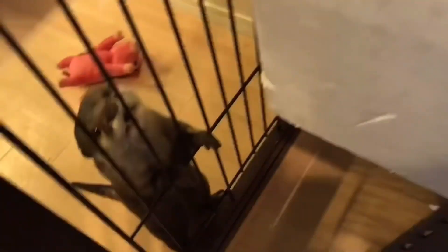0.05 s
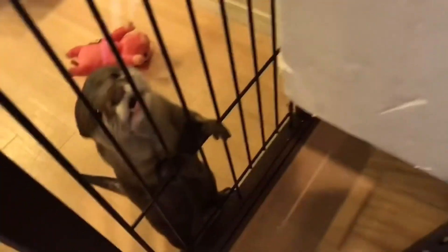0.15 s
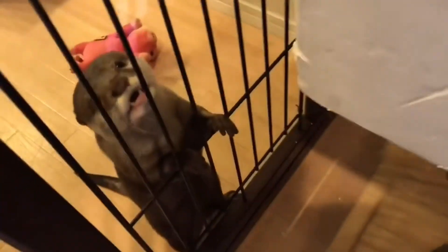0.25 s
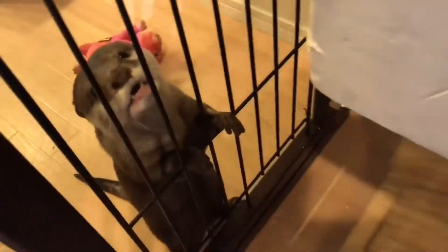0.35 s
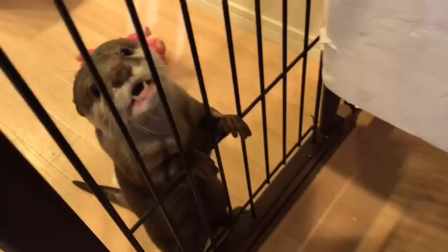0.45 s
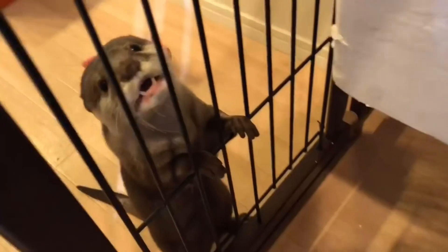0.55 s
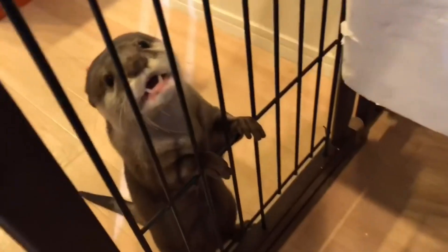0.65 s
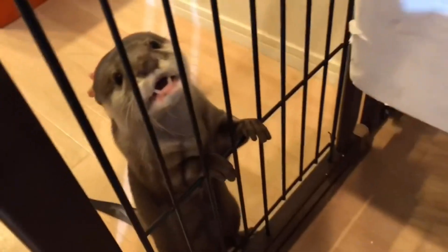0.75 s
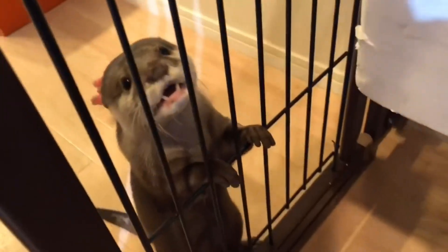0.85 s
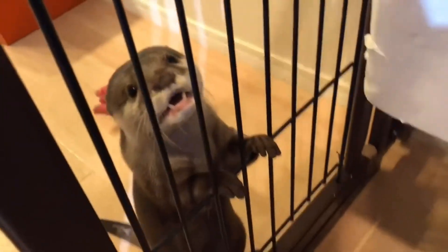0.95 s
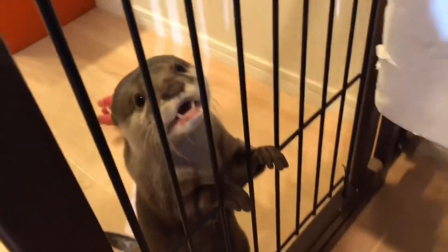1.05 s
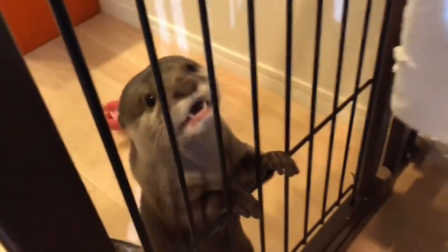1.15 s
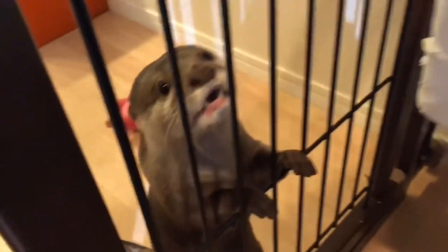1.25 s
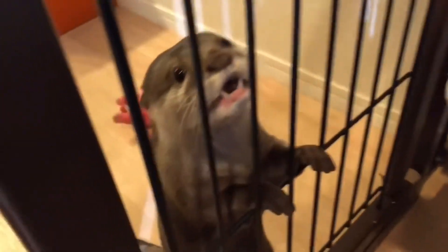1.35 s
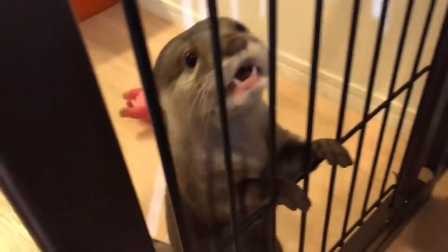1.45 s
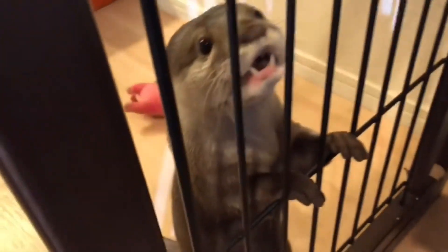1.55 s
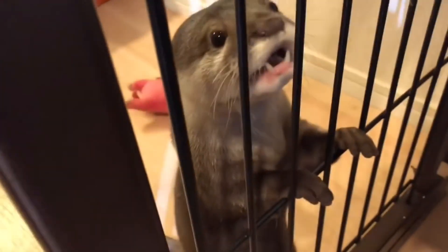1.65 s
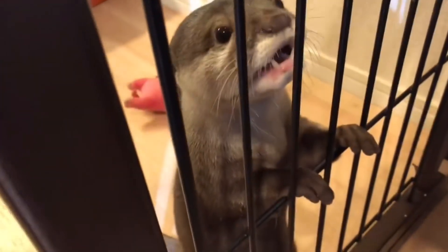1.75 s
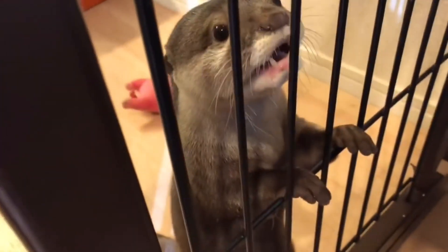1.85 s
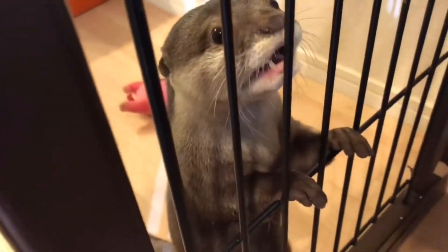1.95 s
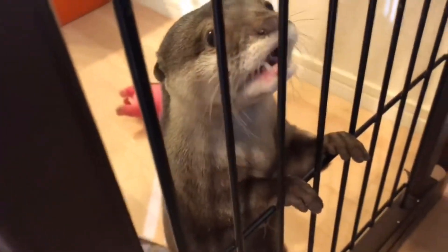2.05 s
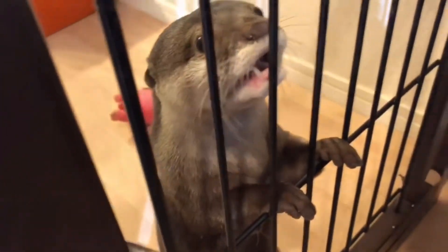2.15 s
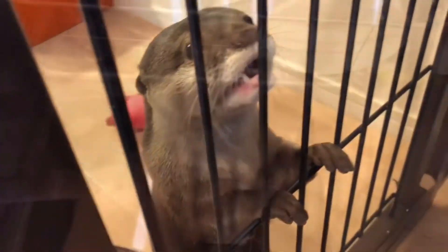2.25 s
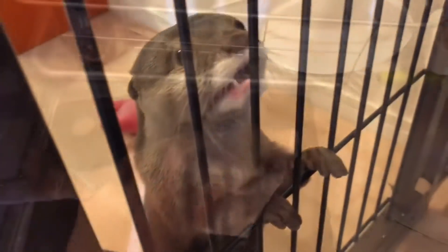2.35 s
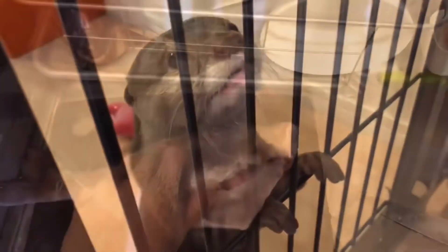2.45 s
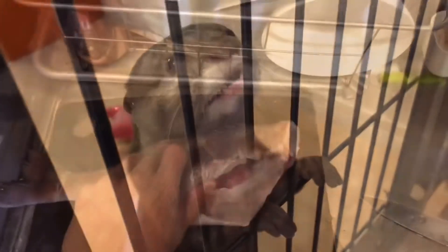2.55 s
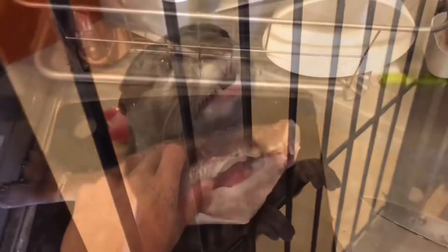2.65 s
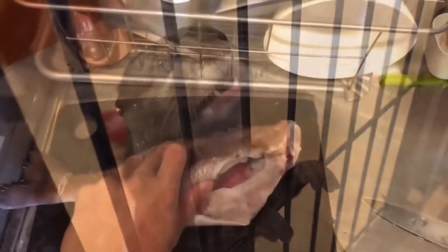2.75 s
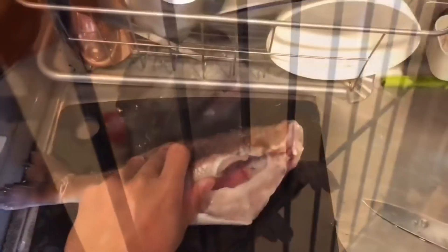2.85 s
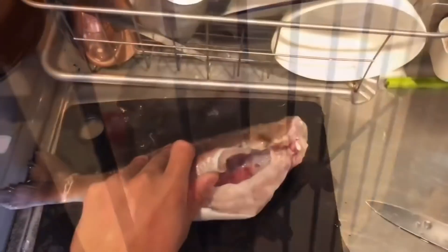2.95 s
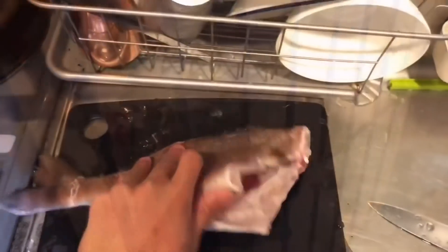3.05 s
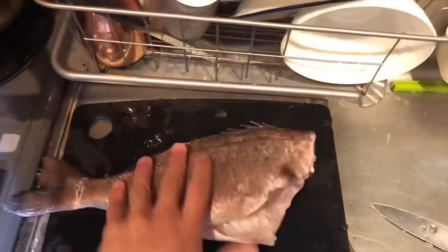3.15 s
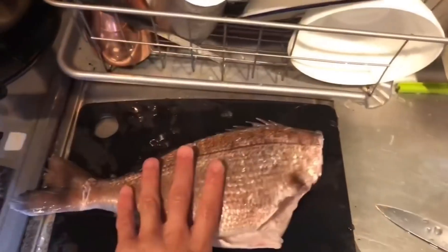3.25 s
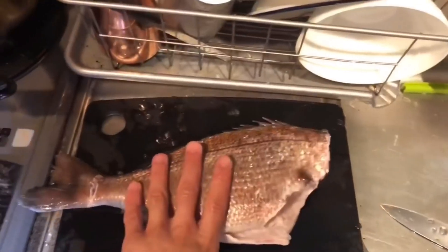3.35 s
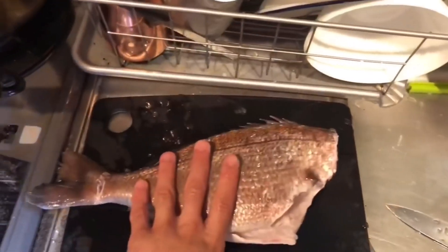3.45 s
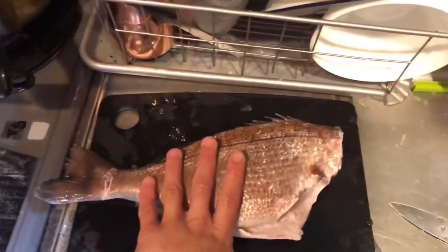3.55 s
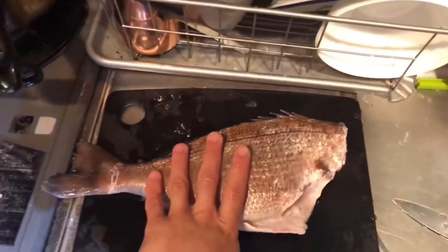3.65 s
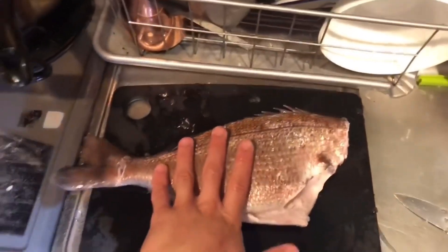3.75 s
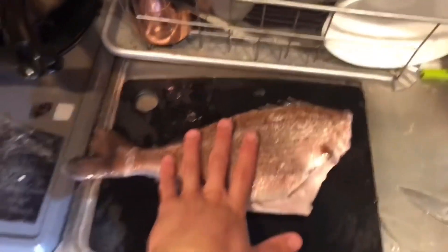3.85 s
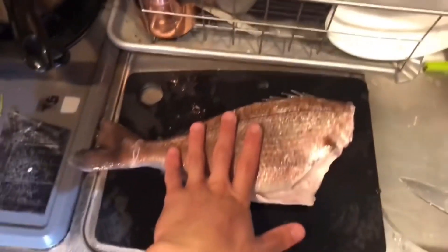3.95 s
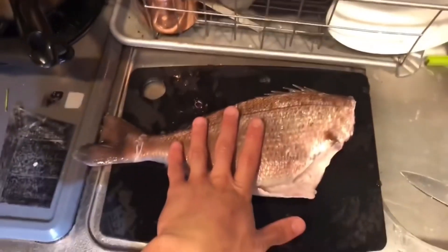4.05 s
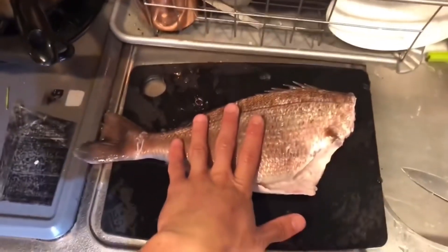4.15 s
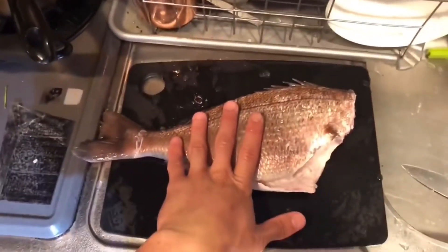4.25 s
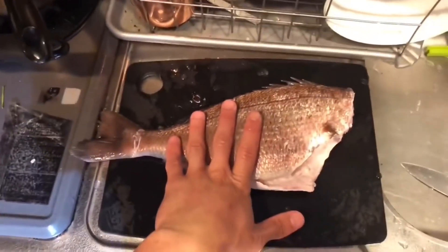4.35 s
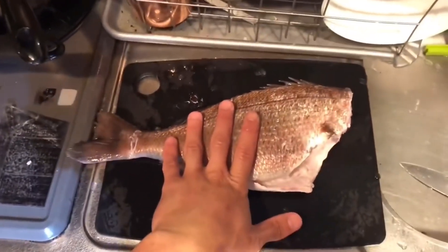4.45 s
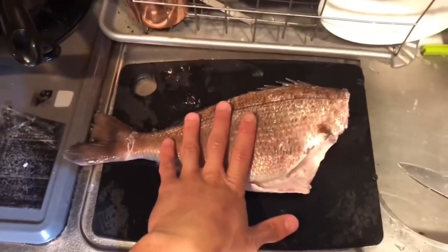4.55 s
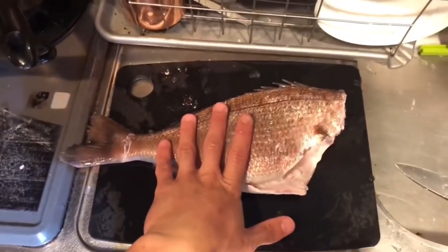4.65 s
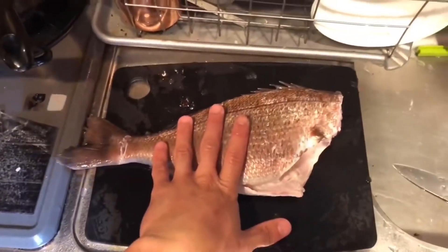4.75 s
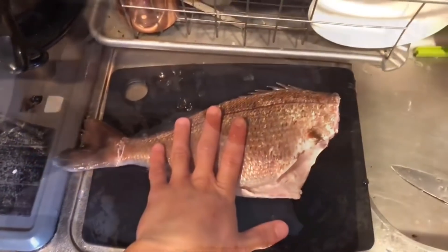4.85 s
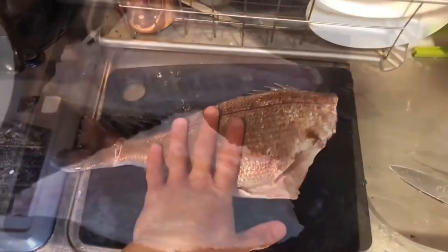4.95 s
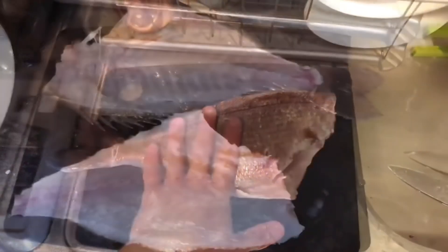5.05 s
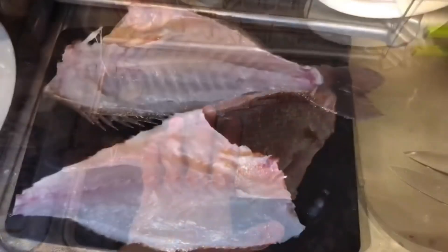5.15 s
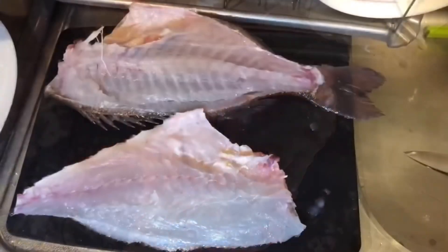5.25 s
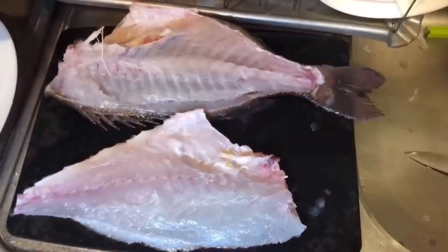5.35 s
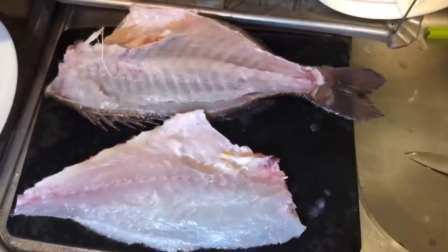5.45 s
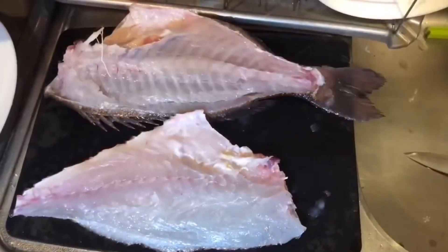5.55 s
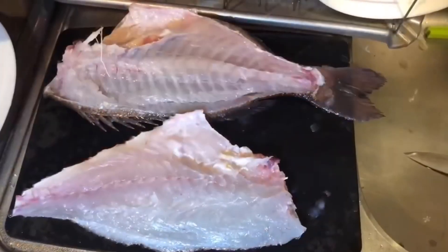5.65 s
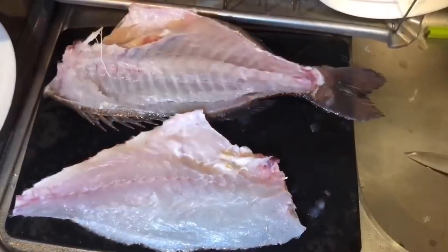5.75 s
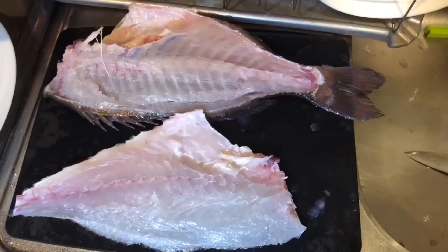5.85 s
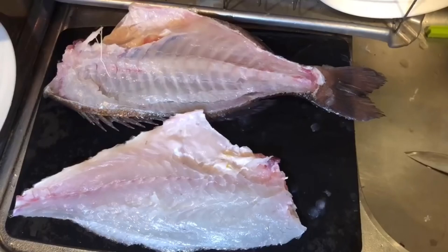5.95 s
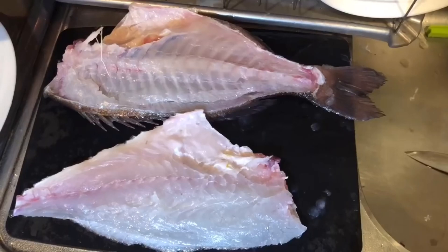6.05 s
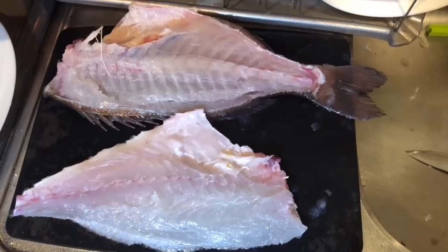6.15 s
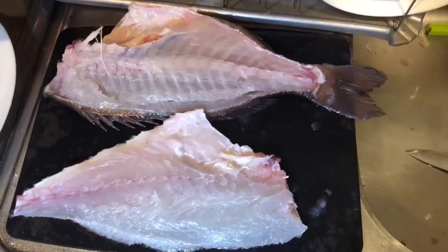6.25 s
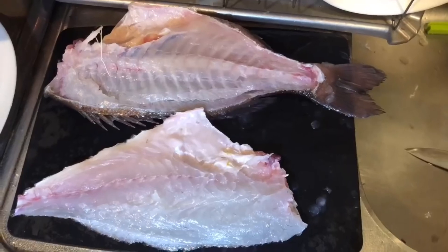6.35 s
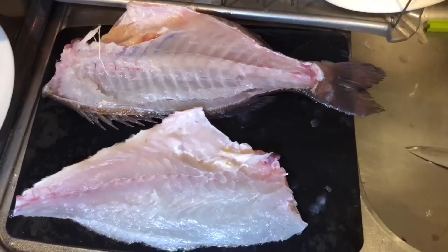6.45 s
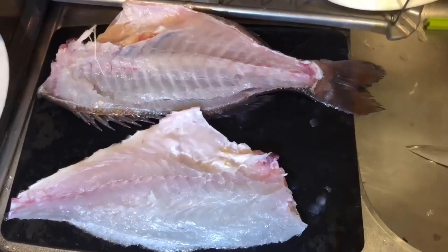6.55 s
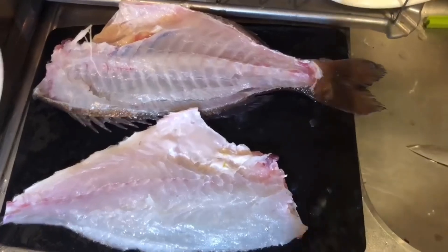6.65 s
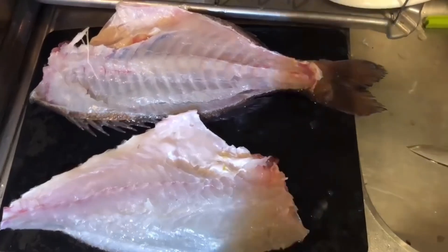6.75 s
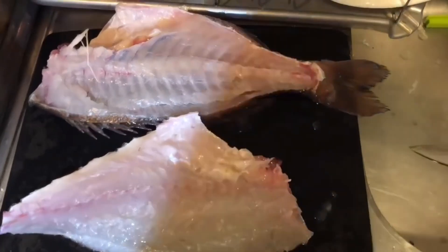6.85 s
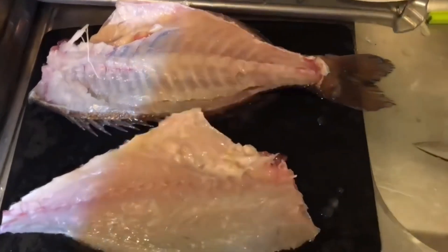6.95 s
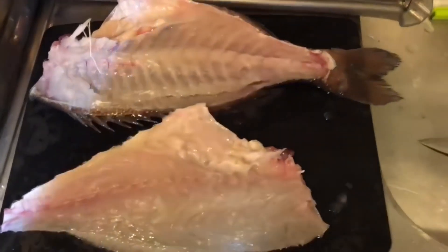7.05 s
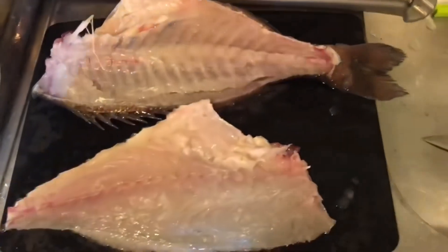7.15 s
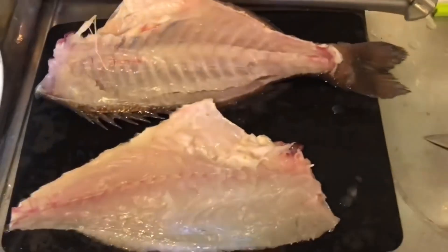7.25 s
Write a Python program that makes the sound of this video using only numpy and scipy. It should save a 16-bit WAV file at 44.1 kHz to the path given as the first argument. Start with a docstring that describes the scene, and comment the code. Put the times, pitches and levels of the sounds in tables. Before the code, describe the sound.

Close to the microphone in a small, dry home room, an otter gives four long, bright, rasping squeals, the third longest and trembling deeply, the fourth quieter and fading. A fan rushes softly throughout. Then, in a kitchen, a hand scuffs lightly over a scaly fish. Across the room the otter drops a sharp whistled chirp into a short whine, and later chirps once more, fainter.

```python
"""A small otter begs close by with four long, wavering, rasping squeals: snapping folds ring the throat.
Then, across a kitchen, a falling chirp (a whistle breaking into rasp) runs into a whine; one more chirp.
A hand strokes a scaly fish with soft scuffs of rubbing grains.
A fan, shaped noise with duct resonances, rushes throughout."""
import sys
import numpy as np
from scipy import signal
from scipy.fft import rfft, irfft
from scipy.io import wavfile
from scipy.ndimage import uniform_filter1d, minimum_filter1d

SR = 44100
rng = np.random.default_rng(int(sys.argv[2]) if len(sys.argv) > 2 else 0)


def unload_wav(signal):
    """Save mono or channel-first audio to the path in sys.argv[1] as 16-bit WAV at rate SR, clipped to [-1, 1]."""
    wavfile.write(
        sys.argv[1],
        SR,
        np.round(np.clip(np.atleast_2d(signal).T, -1, 1) * 32767).astype(np.int16),
    )


N = 322812
TIME_S = np.arange(N) / SR

# fan spectrum: (frequency [Hz], relative density [dB per Hz])
FAN_SPECTRUM = [(15, -44), (25, -7), (107, 1.5), (349, -7.5), (537, -13.5), (703, -12.5), (919, -16.5),
                (1200, -14.5), (2560, -21.5), (4870, -26), (15500, -45)]
# fan duct resonances: (centre [Hz], width [Hz], rise [dB])
DUCT_RESONANCES = [(632, 23, 8.5), (723, 54, 2), (1143, 350, 6)]
# fan level over time, which sags and recovers as its rumble slowly grows: (time [s], level [dB], rumble gain
# [dB])
FAN_LEVELS = [(1.4, -39.5, -8.5), (2.3, -47.5, -6.5), (2.6, -44.5, -4), (3.2, -43.5, -1.5)]
# reverberation at the pen: (frequency [Hz], t60 [s])
PEN_DECAY = [(500, 0.035), (3000, 0.24), (8000, 0.18), (14000, 0.1)]
# reverberation in the kitchen: (frequency [Hz], t60 [s])
KITCHEN_DECAY = [(500, 0.22), (3000, 0.21), (8000, 0.2), (14000, 0.17)]
# strokes and scuffs: (start [s], length [s], level [dB])
STROKES = [(3.175, 0.05, -49), (3.252, 0.044, -43), (3.331, 0.023, -37.5), (3.399, 0.058, -41.5),
           (3.472, 0.06, -41.5), (3.792, 0.15, -46), (3.996, 0.13, -44.5), (5.495, 0.054, -52),
           (5.63, 0.031, -49), (5.815, 0.065, -41.5), (5.975, 0.12, -54.5), (7.185, .03, -57)]
# spectrum of the rubbing grains: (frequency [Hz], gain [dB])
STROKE_SPECTRUM = [(1000, 3), (3200, 3), (5000, 3), (7500, 2), (11000, -2.5), (15500, -2.5)]
# colour of the voice across the kitchen: (frequency [Hz], gain [dB])
FAR_SPECTRUM = [(2500, -0.5), (3100, -5), (3700, 0.5), (4900, -3), (5800, 1), (8000, -9), (9000, -10.5),
                (15000, -1.5)]
# chirps: (start [s], fall start [s], end [s], top pitch [Hz], bottom pitch [Hz], fall time [s],
#          scoop [share of pitch], whistle level [dB], swell [dB])
CHIRP_CALLS = [(4.802, 4.827, 4.864, 3862, 915, .029, -0.0704, -27.5, 6.5),
               (6.356, 6.399, 6.5, 4730, 2213, 0.031, 0.019, -43.5, 10)]
# squeals at the pen: (start [s], end [s], first pitch [Hz], turning pitch [Hz], turn [share of length],
#          last pitch [Hz], scoop [share of pitch], attack [s], onset [dB], level [dB], fade [dB],
#          brightness [dB], basic roughness [0-1])
SQUEAL_CALLS = [(-.1, 0.355, 638, 632.7, 0.5, 628, 0.0082, 0.013, -16, -14.5, 1.7, -5.3, 0.7),
                (0.513, 1.254, 631, 639.6, .52, 626.7, -.1, .014, -26.5, -13.5, -0.5, -6, 0.62),
                (1.405, 2.458, 632.2, 701, .74, 689, -.18, .015, -26.5, -12.5, -4, -4, 0.47),
                (2.644, 3.179, 591, 651.6, .58, 668, -0.028, 0.0172, -22, -20, -22.5, -4.5, 0.47)]
# whines across the kitchen, the first dropping out of a chirp: columns as SQUEAL_CALLS
WHINE_CALLS = [(4.836, 5.118, 638, 683, .68, 646, 3, .027, 12.5, -29.5, -3, -5, 0.6),
               (5.118, 5.331, 618, 599.6, .36, 649, -0.5, 0.0068, -5, -36, -14, -5, .3)]
# throat spectrum of one snap of the folds: (frequency [Hz], gain [dB])
THROAT_SPECTRUM = [(500, -33), (1500, -30), (2000, -12), (2480, -11.5), (2780, -3), (3350, -1), (3850, -6),
                   (4250, -1.5), (5000, -3), (5400, -8), (6100, -9.5), (7300, -2), (8000, -8.5),
                   (8750, -5.5), (10000, -18), (16000, -27)]
# mouth shape by call: (time [s], mouth resonance [dB], throat resonance [dB], anti-resonance [Hz],
#          second flow tone [dB], third flow tone [dB])
MOUTH_SHAPES = [(.2, 6, -4, 11100, -17, -39), (.9, 7.7, -3, 11540, -17.5, -43),
                (1.9, 2.5, 5, 12800, -19, -20.5), (2.9, 3.6, 7, 12500, -17, -17.5),
                (5.1, 4.7, -6.5, 11000, -18, -25)]
# reflections from floor and pen: (delay [s], gain [dB])
REFLECTIONS = [(.00062, -22), (.00128, -17), (.0019, -31)]
# rasp locks into clear half tones: (time [s], half length [s])
LOCK_MOMENTS = [(.335, .03), (.85, .06), (3.02, .04)]
# folds run clean between catch and rasp: (start [s], end [s], roughness [0-1])
CLEAN_STRETCHES = [(.525, .615, .03), (1.456, 1.603, .14), (2.64, 2.988, .17), (4.95, 5.085, .1),
                   (5.135, 5.35, .08)]
# trembling of the pitch: (time [s], dip depth [share of pitch])
TREMBLE_DEPTHS = [(.3, .012), (1.25, .025), (1.48, 0.072), (1.64, .02), (1.98, .11), (2.19, .31),
                  (2.45, 0.21), (2.65, .012)]
# single catches in the voice: (time [s], drop [share of pitch])
VOICE_CATCHES = [(0.627, 0.024), (1.442, .11), (1.817, .09), (2.052, .06), (2.239, .07), (2.717, .03),
                 (2.815, 0.0403), (5.11, .08)]

CHIRP_RISE_S, CHIRP_ONSET_DB = .0125, -13  # soft start, then a snap to full pitch and level
CHIRP_ROUGH, CHIRP_BREAK_S = 0.083, 0.046  # initial roughness; fall time that adds a roughness of 1
MOUTH_HZ, MOUTH_WIDTH_HZ = 2970, 1070
LOW_RING_HZ, LOW_RING_WIDTH_HZ = 1926, 410  # deep in the throat
HOLLOW_WIDTH_HZ, HOLLOW_DB = 800, -11  # anti-resonance of a side cavity
FUNDAMENTAL_DB = -27.5  # lowest flow tone against the snaps
DULL_DB, DULL_S = -8, 0.064  # each call starts dull and brightens
FADE_POWER = 2.57  # fade follows this power of the elapsed share
RISE_S, RELEASE_S = .003, .005
LOCK_SHARE = 0.57  # share of roughness lost in a lock
UNSPLIT = 1.8  # strong-weak alternation lost per unit of tremble depth
BREAK_S, CLEAN_SPLIT = 0.02, 0.062  # time to change state; alternation when clean
TREMBLE_HZ, QUICKENS_HZ_PER_S, DEEPEST_DIP_S = 16.8, 1.25, 2.238  # rate holds at the deepest dip
CATCH_S = 0.01  # half length
EDGE_HZ = 15850  # band limit


def gain_of(db):
    """Decibels as an amplitude gain."""
    return 10 ** (np.asarray(db) / 20)


def evened(x):
    """Scales a sound to unit mean power."""
    return x / np.sqrt(np.mean(x ** 2) + 1e-20)


def steadied(x, size=1300):
    """Holds the short-term power at one."""
    power = uniform_filter1d(uniform_filter1d(x ** 2, size), size).clip(0)
    return x / np.sqrt(power + 1e-12)


def read(points, hz):
    """Reads a curve joined by lines on a log-frequency axis."""
    f, value = np.transpose(points)
    return np.interp(np.log(hz + 1), np.log(f + 1), value)


def follow(rows, t):
    """Every column of a time curve at the times t."""
    s, *columns = np.transpose(rows)
    return [np.interp(t, s, c) for c in columns]


def glide(t, times, values):
    """Eases from each value to the next."""
    step = np.interp(t, times, np.arange(len(times)))
    eased = np.floor(step) + np.sin(np.pi / 2 * (step % 1)) ** 2
    return np.interp(eased, np.arange(len(times)), values)


def drift(count, hz):
    """Random wander of unit size, up to about hz."""
    f = np.fft.rfftfreq(N, 1 / SR)
    return evened(irfft(rfft(rng.standard_normal(N)) * np.exp(-(f / hz) ** 2), N))[:count]


def fade(t, rise_s, fall_s):
    """Linear start and stop."""
    return np.clip((t - t[0]) / rise_s, 0, 1) * np.clip((t[-1] - t) / fall_s, 0, 1)


def filtered(x, order, hz, kind="low"):
    """Butterworth filter without phase shift."""
    return signal.sosfiltfilt(signal.butter(order, hz, kind, fs=SR, output="sos"), x)


def coloured(x, points):
    """Gives a sound a spectrum."""
    hz = np.fft.rfftfreq(len(x), 1 / SR)
    return irfft(rfft(x) * gain_of(read(points, hz)), len(x))


def bump(hz, centre_hz, width_hz, db):
    """A resonance as a rise in dB."""
    return db / (1 + (2 * (hz - centre_hz) / width_hz) ** 2)


def add(mix, start_s, sound):
    """Adds a sound into the mix in place."""
    part = mix[max(round(start_s * SR), 0):][:len(sound)]
    part += sound[:len(part)]


def room(x, decay, wet_db, gap_s):
    """Direct sound plus dense reflections, each band dying at its own speed; keeps power roughly constant."""
    sparse = rng.random(SR) < .1
    taps = rng.choice([-1., 1.], SR) * sparse * (np.arange(SR) > gap_s * SR)
    hz, t, z = signal.stft(taps, SR, nperseg=256)
    decaying = z * gain_of(-60 * t / read(decay, hz)[:, None])
    tail = signal.istft(decaying, SR, nperseg=256)[1]
    reflected = signal.fftconvolve(x, tail / np.linalg.norm(tail))[:N]
    wet = gain_of(wet_db)
    return (x + wet * reflected) / np.hypot(1, wet)


def fan(swell_db=1.07, rumble_hz=210):
    """Rush of air: shaped noise with duct resonances, slight swells and a rumble of changing strength."""
    hz = np.fft.rfftfreq(N, 1 / SR)
    colour_db = read(FAN_SPECTRUM, hz) + sum(bump(hz, *mode) for mode in DUCT_RESONANCES)
    rush = evened(irfft(rfft(rng.standard_normal(N)) * gain_of(colour_db), N))
    rumble = filtered(rush, 3, rumble_hz)
    level_db, rumble_db = follow(FAN_LEVELS, TIME_S)
    air = rush + (gain_of(rumble_db) - 1) * rumble
    return air * gain_of(level_db + swell_db * drift(N, hz=5.9))


def scuffs():
    """Each stroke is a swell of fine rubbing grains, as coloured noise."""
    grains = rng.standard_normal(N)
    pressure = np.zeros(N)
    for start_s, length_s, db in STROKES:
        add(pressure, start_s, gain_of(db) * signal.windows.tukey(int(length_s * SR), .8))
    return evened(coloured(grains, STROKE_SPECTRUM)) * pressure


def chirp(row, scatter=0.108, second_db=-9, third_db=-15, rasp=0.2):
    """A high whistle that drops, swells and breaks up into a rasp as it falls."""
    start_s, fall_at_s, end_s, top_hz, bottom_hz, fall_s, scoop, whistle_db, swell_db = row
    t = np.arange(start_s, end_s, 1 / SR)
    falling_s = np.maximum(t - fall_at_s, 0)
    onset = np.exp(-((t - start_s) / CHIRP_RISE_S) ** 6)
    hz = bottom_hz + (top_hz - bottom_hz) * np.exp(-falling_s / fall_s)
    hz = hz * (1 + scoop * onset)
    swell = np.sin(np.pi * falling_s / (end_s - fall_at_s)) ** 2
    level_db = whistle_db + CHIRP_ONSET_DB * onset + swell_db * swell
    rough = np.minimum(CHIRP_ROUGH + falling_s / CHIRP_BREAK_S, 1)
    phase = 2 * np.pi * np.cumsum(hz * (1 + scatter * rough * drift(len(t), hz=700))) / SR
    tone = sum(gain_of(db) * np.sin((k + 1) * phase) for k, db in enumerate([0, second_db, third_db]))
    voice = evened(tone) + rasp * rough * rng.standard_normal(len(t))
    mouth = [(1000, -32), (2400, 3), (8000, 8), (12000, -12)]  # (frequency [Hz], gain [dB])
    voice = evened(coloured(voice, mouth))
    return t[0], gain_of(level_db) * voice * fade(t, rise_s=0.0017, fall_s=0.0037)


def tremble(t, depth, narrow=1.3):
    """Pitch factor: regular dips that slowly quicken, and a few single catches."""
    since_s = t - DEEPEST_DIP_S
    cycles = since_s * (TREMBLE_HZ + QUICKENS_HZ_PER_S * since_s / 2)
    dip = abs(np.cos(np.pi * cycles)) ** (2 * narrow)
    caught = sum(drop * np.exp(-((t - s) / CATCH_S) ** 2) for s, drop in VOICE_CATCHES)
    return 1 - depth * dip - caught


def folds(t, roughness, depth, wander=0.18):
    """Roughness and alternation: outside clean stretches the folds break into a strong-weak rasp."""
    locked = sum(np.exp(-((t - s) / half_s) ** 2) for s, half_s in LOCK_MOMENTS)
    rough = roughness * (1 - LOCK_SHARE * locked) * (1 + wander * drift(len(t), hz=14))
    split = 1 - UNSPLIT * depth
    for start_s, end_s, clean_rough in CLEAN_STRETCHES:
        clean = np.clip(.5 + np.minimum(t - start_s, end_s - t) / BREAK_S, 0, 1)
        rough = rough + clean * (clean_rough - rough)
        split = split + clean * (CLEAN_SPLIT - split)
    return np.clip([rough, split], 0, 1)


def snaps(turns, rough, split, jitter_s=.00005, limp_s=.00004, uneven_db=3, weak_db=1.5):
    """One click a cycle; rough folds close early or late, alternate closures are weak and late."""
    at = np.interp(np.arange(1, int(turns[-1])), turns, np.arange(len(turns)))  # [samples]
    sample = at.astype(int)
    late, loud = rng.standard_normal((len(at), 2)).T
    limp = split[sample] * (-1) ** np.arange(len(at))
    at = at + SR * (jitter_s * rough[sample] * late + limp_s * limp)
    height = gain_of(uneven_db * rough[sample] * loud - weak_db * limp)
    # windowed sinc places each click between samples
    near = at.astype(int)[:, None] + np.arange(-8, 9)
    offset = near - at[:, None]
    click = np.sinc(offset) * np.cos(np.pi * offset / 18) ** 2
    where = near.clip(0, len(turns) - 1).ravel()
    return np.bincount(where, (height[:, None] * click).ravel(), len(turns))


def puffs(turns, rasp_hz=6000):
    """Air hisses after each closure and dies away within the cycle."""
    highpass = signal.butter(2, rasp_hz, "high", fs=SR, output="sos")
    hiss = signal.sosfilt(highpass, rng.standard_normal(len(turns)))
    return evened(np.exp(-2 * (turns % 1)) * hiss)


def throat_ring(mouth_db, low_db, hollow_hz, size=4096):
    """Causal (minimum-phase) ring of throat and mouth after one snap, with nearby reflections."""
    hz = abs(np.fft.fftfreq(size, 1 / SR))
    db = read(THROAT_SPECTRUM, hz)
    db += bump(hz, MOUTH_HZ, MOUTH_WIDTH_HZ, mouth_db)
    db += bump(hz, LOW_RING_HZ, LOW_RING_WIDTH_HZ, low_db)
    db += bump(hz, hollow_hz, HOLLOW_WIDTH_HZ, HOLLOW_DB)
    minimum_phase = np.exp(np.conj(signal.hilbert(np.log(gain_of(db)))))
    ring = np.fft.ifft(minimum_phase).real[:size // 4]
    return ring + sum(gain_of(g_db) * np.roll(ring, round(delay_s * SR)) for delay_s, g_db in REFLECTIONS)


def brightened(voice, bright_db, split_hz=5800):
    """Sets the treble share: harder closure puts more power in the treble."""
    body = filtered(voice, 4, split_hz)
    edge = np.clip(gain_of(bright_db), 0, .9)
    return np.sqrt(1 - edge ** 2) * steadied(body) + edge * steadied(voice - body)


def smooth_flow(turns, split, second_db, third_db, limp=0.22):
    """Low tones of the flow through the folds; alternating cycles add half tones."""
    levels_db = [FUNDAMENTAL_DB, second_db, third_db]
    flow = sum(gain_of(db) * np.sin(2 * np.pi * (k + 1) * turns) for k, db in enumerate(levels_db))
    return flow * (1 + limp * split * np.cos(np.pi * turns))


def squeal(row, waver=0.006, rasp=0.97, sag_db_per_octave=8, flutter_db=1.0):
    """Snapping folds and puffs of air ring the throat, above the smooth low tones of the flow."""
    (start_s, end_s, first_hz, turn_hz, turn, last_hz, scoop,
     attack_s, onset_db, held_db, fade_db, held_bright_db, roughness) = row
    length_s = end_s - start_s
    t = np.arange(max(start_s, 0), end_s, 1 / SR)
    since_s = t - start_s
    onset = np.exp(-since_s / attack_s)
    level_db = held_db + onset_db * onset + fade_db * (since_s / length_s) ** FADE_POWER
    bright_db = held_bright_db + DULL_DB * np.exp(-since_s / DULL_S)
    depth, = follow(TREMBLE_DEPTHS, t)
    rough, split = folds(t, roughness, depth)
    mouth_db, low_db, hollow_hz, second_db, third_db = follow(MOUTH_SHAPES, t.mean())

    hz = glide(t, [start_s, start_s + turn * length_s, end_s], [first_hz, turn_hz, last_hz])
    hz = hz * (1 + scoop * onset) * tremble(t, depth) * (1 + waver * drift(len(t), hz=50.4))
    turns = np.cumsum(hz) / SR

    drive = evened(snaps(turns, rough, split)) + rasp * rough * puffs(turns)
    voice = signal.fftconvolve(drive, throat_ring(mouth_db, low_db, hollow_hz))[:len(t)]
    voice = brightened(voice, bright_db) + smooth_flow(turns, split, second_db, third_db)
    # pitch and level give way together
    sag_db = sag_db_per_octave * np.minimum(np.log2(hz / np.median(hz)), 0)
    level_db = level_db + sag_db + flutter_db * drift(len(t), hz=46.2)
    return t[0], gain_of(level_db) * voice * fade(t, RISE_S, RELEASE_S)


def scene():
    """Fan, scuffs, chirps and whines across the kitchen, squeals at the pen; same in both channels."""
    near, far = np.zeros((2, N))
    for row in CHIRP_CALLS:
        add(far, *chirp(row))
    for row in WHINE_CALLS:
        add(far, *squeal(row))
    for row in SQUEAL_CALLS:
        add(near, *squeal(row))
    mix = fan() + room(scuffs(), KITCHEN_DECAY, wet_db=-0.5, gap_s=0.0077)
    mix = mix + room(coloured(far, FAR_SPECTRUM), KITCHEN_DECAY, wet_db=2, gap_s=.004)
    mix = mix + room(near, PEN_DECAY, wet_db=-11, gap_s=.003)
    return np.array([mix, mix])


def record(dry):
    """A quick limiter holds the sharpest snaps under full scale; then the band limit."""
    headroom = .88 / np.maximum(abs(dry).max(0), .88)
    gain = minimum_filter1d(headroom, size=121)
    gain = uniform_filter1d(uniform_filter1d(gain, size=61), size=61)
    lowpass = signal.firwin(511, EDGE_HZ, window=("kaiser", 9), fs=SR)
    return signal.oaconvolve(dry * gain, lowpass[None], "same")


dry = scene()
out = record(dry)
unload_wav(out)
```